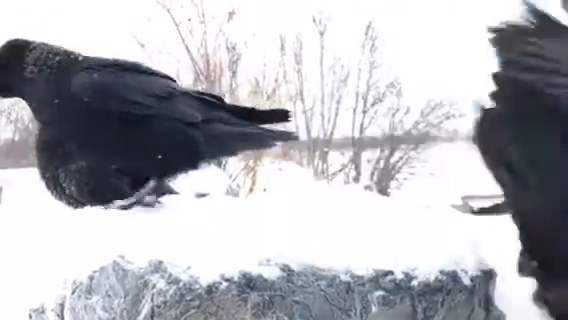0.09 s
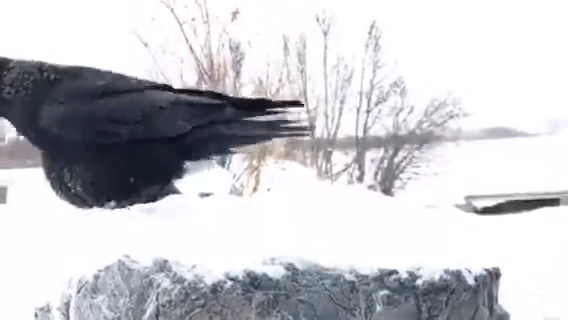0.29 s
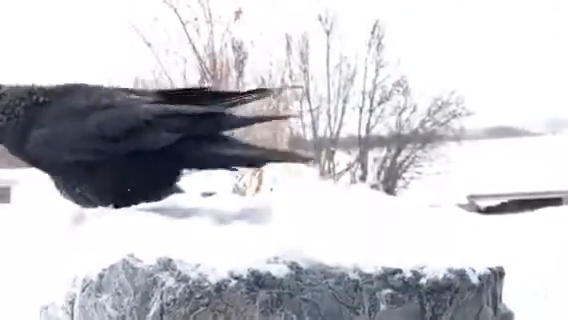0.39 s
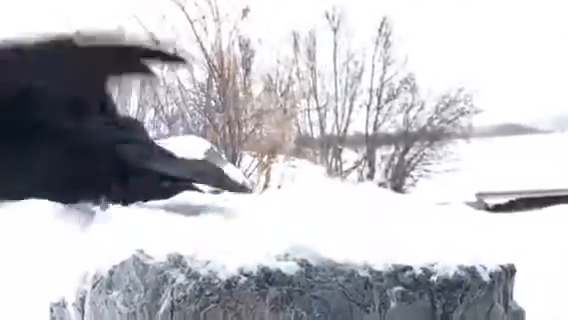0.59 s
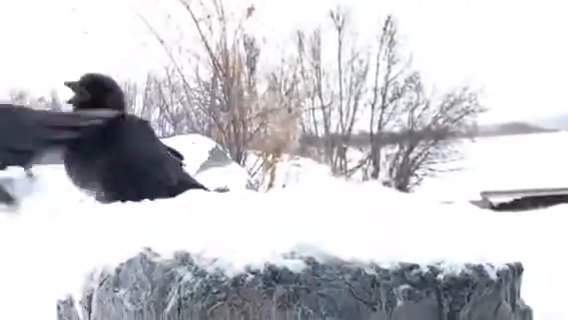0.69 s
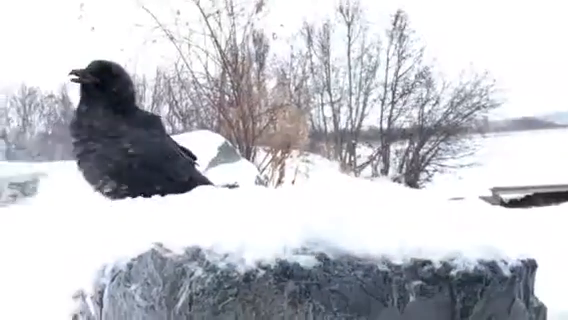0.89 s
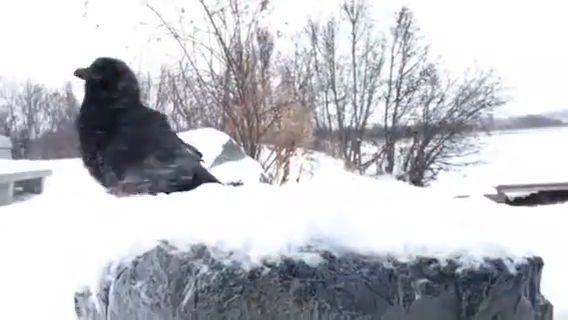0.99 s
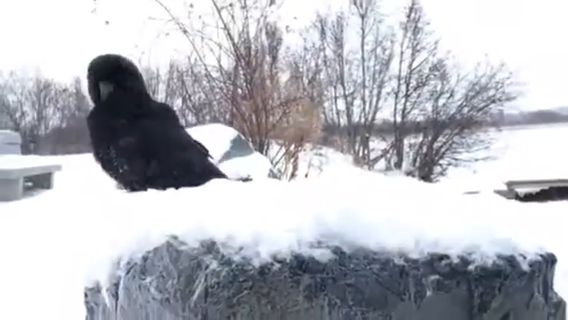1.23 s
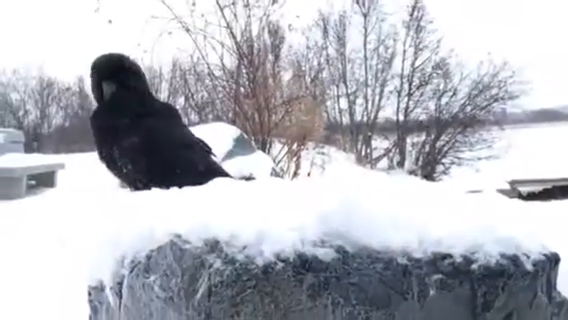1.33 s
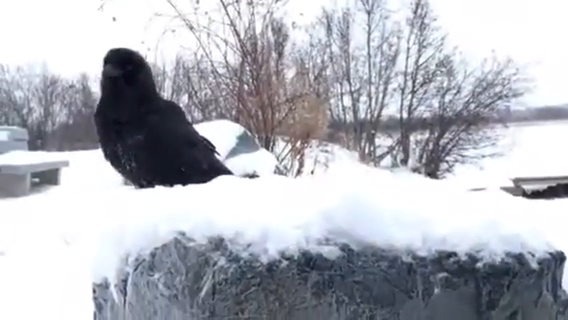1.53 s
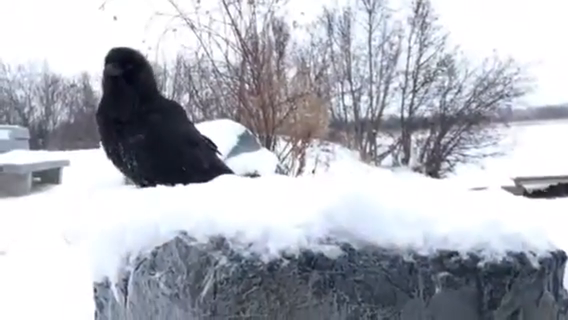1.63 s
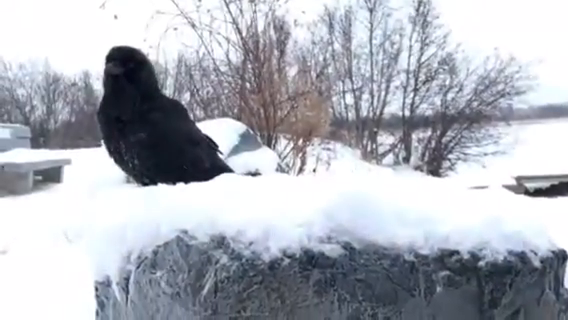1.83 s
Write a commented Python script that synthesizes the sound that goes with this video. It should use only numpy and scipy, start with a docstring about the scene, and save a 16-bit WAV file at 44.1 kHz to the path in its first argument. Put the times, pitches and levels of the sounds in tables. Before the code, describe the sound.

Two short raven calls in a quiet snowy open place, close to the microphone: first a rough caw, then wing strokes and feather ticks, finally a brighter, trembling two-toned cry, with little echo.

```python
"""A snowy stump outdoors with two ravens on it. The near one draws breath (coloured noise) and gives a hoarse
caw: throat-filtered harmonics and air noise, with a voice that keeps catching. Wings and feathers rustle
(patchy noise, swishes, snaps); then comes a clearer, fluttering call, whose second voice joins midway and
makes sum and difference tones. Behind them are a low distant rumble, soft hiss and a faint wavering tone."""
import sys
import numpy as np
from scipy import signal
from scipy.fft import rfft, irfft, next_fast_len
from scipy.io import wavfile
from scipy.ndimage import uniform_filter1d, map_coordinates

SR = 44100
rng = np.random.default_rng(int(sys.argv[2]) if len(sys.argv) > 2 else 0)


def gain_from_decibels(decibels):
    """Convert decibel values to linear amplitude factors."""
    exponent = np.asarray(decibels, float) / 20
    return 10 ** exponent


def unload_wav(signal):
    """Save mono or channel-first audio to the path in sys.argv[1] as 16-bit WAV at rate SR, clipped to [-1, 1]."""
    wavfile.write(
        sys.argv[1],
        SR,
        np.round(np.clip(np.atleast_2d(signal).T, -1, 1) * 32767).astype(np.int16),
    )


N = 83790


def unit(x):
    """Normalisation: scales a signal to rms 1."""
    return x / np.sqrt(np.mean(x ** 2) + 1e-20)


def along(points, hz):
    """Spectral envelope: interpolates (f, value) points on a logarithmic frequency axis."""
    f, v = np.transpose(points)
    return np.interp(np.log(hz + 1), np.log(f + 1), v)


def curves(rows):
    """Piecewise-linear envelopes: each column after the time, then a gate with 2 ms ramps inside the span."""
    s, *columns = np.transpose(rows)
    t = np.arange(N) / SR
    edge = np.clip(np.minimum(t - s[0], s[-1] - t) / .002, 0, 1)
    return [np.interp(t, s, column) for column in columns] + [edge]


def wobble(rate):
    """Slow random modulation: a smooth curve through normal random knots, rate knots a second."""
    knots = rng.standard_normal(int(N * rate / SR) + 4)
    return map_coordinates(knots, [np.arange(N) * rate / SR])


def filtered(x, response):
    """Linear filtering: multiplies the spectrum by a response of frequency, with padding."""
    m = next_fast_len(N + 8192)
    return irfft(rfft(x, m) * response(np.fft.rfftfreq(m, 1 / SR)), m)[..., :N]


def coloured_noise(colour):
    """Spectral shaping: white noise takes the given colour, at rms 1."""
    return unit(filtered(rng.standard_normal(N), lambda hz: gain_from_decibels(along(colour, hz))))


def bell(t, middle, half_length):
    """Gaussian envelope: 1 in the middle, 1/e at one half length away."""
    return np.exp(-((t - middle) / half_length) ** 2)


def patchy(x, db):
    """Time-frequency modulation: smoothed random gains, of rms db, over the short-time spectrum."""
    z = signal.stft(x, nperseg=256)[2]
    field = uniform_filter1d(uniform_filter1d(rng.standard_normal(z.shape), 14, 0), 6, 1)
    return unit(signal.istft(z * gain_from_decibels(db * unit(field)), nperseg=256)[1][:N])


# low rumble with the beat of wings in it: (t/s, level/dB)
RUMBLE_LEVEL = [(0.0, -48.5), (0.38, -59.5), (0.766, -58), (0.904, -40.5), (1.036, -49.5), (1.1, -39.5),
                (1.2, -49), (1.312, -45), (1.348, -55), (1.9, -54.5)]
# spectrum of the rumble: (f/Hz, relative level/dB)
RUMBLE_SPECTRUM = [(8.8, -37.5), (15, -1.5), (43, 2.5), (139, 6.5), (304, -15), (400, -20), (520, -46.5),
                   (880, -120)]
# the hiss sinks by the end of the caw and returns: (t/s, level/dB)
HISS_LEVEL = [(0, -59), (.2, -55.5), (.44, -70), (.75, -61), (1.2, -54.5), (1.5, -59), (1.9, -57)]
# spectrum of the hiss: (f/Hz, relative level/dB)
HISS_SPECTRUM = [(150, -33), (250, -20.5), (445, -13.5), (791, -14), (848, -7), (1340, -8.5), (2460, -10),
                 (2830, -21), (3370, -17), (5890, -17.5), (16200, -28)]
TONE_HZ, TONE_WIDTH_HZ, TONE_DB = 904.5, 70, -11  # centre, half width at 1/e, mid level over the hiss


def background():
    """Band-limited noise: rumble, hiss and a narrow band that is heard as a wavering tone."""
    tone = unit(filtered(rng.standard_normal(N), lambda hz: bell(hz, TONE_HZ, TONE_WIDTH_HZ)))
    far = coloured_noise(HISS_SPECTRUM) + gain_from_decibels(TONE_DB + 4 * wobble(22)) * tone
    rumble = gain_from_decibels(curves(RUMBLE_LEVEL)[0]) * coloured_noise(RUMBLE_SPECTRUM)
    return rumble + gain_from_decibels(curves(HISS_LEVEL)[0]) * far


YARD_DB, YARD_T60_S = -37, .4  # energy of the answer relative to its source, time to decay by 60 dB


def yard(x):
    """Diffuse reverberation: convolution with exponentially decaying noise gives a weak short answer."""
    t = np.arange(SR // 2) / SR
    tail = rng.standard_normal(len(t)) * gain_from_decibels(-60 * t / YARD_T60_S)
    return gain_from_decibels(YARD_DB) * signal.fftconvolve(x, tail / np.linalg.norm(tail))[:N]


# treble level of the rustle, before strokes and crackle: (t/s, level/dB)
RUSTLE_LEVEL = [(0.764, -62), (0.818, -62.5), (0.952, -58.5), (1.168, -59), (1.46, -73)]
# spectrum of rustle and snaps: (f/Hz, relative level/dB)
RUSTLE_SPECTRUM = [(150, -28), (250, -7.5), (819, -9.5), (878, -11.5), (1730, -6.5), (2830, -15.5),
                   (3140, -12.5), (8640, -12.5), (15100, -19), (16200, -18.5)]
# swells of the rustle with each wing stroke: (middle t/s, half length t/s, gain level/dB)
WING_STROKES = [(0.809, 0.032, 7), (.915, .015, 2), (0.948, .015, 6), (1.018, .02, 4), (1.12, 0.009, 5.5)]
# thin swishes and ticks of feathers: (middle t/s, half length t/s, level/dB)
FEATHER_SWISHES = [(.004, 0.005, -52.5), (0.081, 0.0011, -51), (0.464, 0.028, -50.5),
                   (0.549, 0.00185, -52.5), (0.622, 0.14, -60.5), (1.271, 0.0021, -39), (1.8, 0.017, -56.5)]
# spectrum of the swishes: (f/Hz, relative level/dB)
SWISH_SPECTRUM = [(1470, -39), (2500, -10.5), (3390, -6), (5910, -7), (16200, -10.5)]
# feather snaps: (one length before the peak t/s, relative peak level/dB, rise and decay length t/s)
FEATHER_SNAPS = [(0.767, -28, 0.0012), (0.7825, -26, 0.0016), (0.8055, -28, 0.0014), (0.939, -26, 0.002),
                 (0.989, -23, 0.0012), (1.0125, -30, 0.0015), (1.095, -19, 0.002), (1.156, -29, 0.002)]
RUSTLE_DB = 7.5  # the whole band over its treble
CRACKLE_DB, PATCHY_DB = 1.7, 2.5  # unevenness in time; over time and frequency


def wings():
    """Friction noise: uneven rustle swelling with the strokes, thin swishes and single snaps of feathers."""
    level_db, edge = curves(RUSTLE_LEVEL)
    t = np.arange(N) / SR
    stroke_db = sum(db * bell(t, s, half) for s, half, db in WING_STROKES)
    crackle_db = CRACKLE_DB * (wobble(69) + wobble(500))
    grain = edge * gain_from_decibels(level_db + RUSTLE_DB + stroke_db + crackle_db)
    swish = sum(gain_from_decibels(db) * bell(t, s, half) for s, half, db in FEATHER_SWISHES)
    snaps = 0.2 * sum(gain_from_decibels(db) * np.exp(-np.abs(t - s - length) / length) for s, db, length in FEATHER_SNAPS)
    rustle = grain * patchy(coloured_noise(RUSTLE_SPECTRUM), PATCHY_DB)
    return rustle + swish * coloured_noise(SWISH_SPECTRUM) + snaps * coloured_noise(RUSTLE_SPECTRUM)


# the indrawn breath before the caw: (t/s, level/dB around which it wavers)
INHALE_LEVEL = [(0.085, -67.5), (0.127, -48), (0.203, -45.5), (0.207, -31.5)]
# spectrum of the breath: (f/Hz, relative level/dB)
INHALE_SPECTRUM = [(410, -59), (700, -56), (977, -17), (1350, 1.5), (2400, -23.5), (2760, -12), (3480, -9),
                   (4980, -17.5), (6600, -15.5), (7700, -20), (15000, -24.5)]


def inhale():
    """Turbulent flow: air drawn through the open throat makes wavering coloured noise."""
    level_db, edge = curves(INHALE_LEVEL)
    return edge * gain_from_decibels(level_db + wobble(110)) * coloured_noise(INHALE_SPECTRUM)


# clear call: (t/s, pitch f/Hz, 1st to 4th partial level/dB in four columns, base level/dB of the
# higher partials, base flutter depth 0-1)
CALL_TRACK = [(1.205, 754, -49, -46, -49, -75, -73, 0.3), (1.219, 798, -25, -27.5, -29.5, -36, -45, 0.22),
              (1.247, 891.3, -18, -27, -33, -54, -38.5, 0.1),
              (1.277, 913, -19.5, -29.5, -30.5, -41.5, -40, 0.07),
              (1.341, 949.4, -19, -37.5, -53, -55, -45, 0.16),
              (1.375, 936.3, -20, -32, -44.5, -41.5, -41, 0),
              (1.475, 920.8, -23, -27, -36, -38.5, -42, 0.11),
              (1.495, 905, -25.5, -26.5, -38, -53, -42.5, 0.07),
              (1.511, 829, -32.5, -30, -38, -53, -47, 0.1), (1.538, 567, -56.5, -39.5, -57, -73, -68, 0)]
# throat resonances that the 5th to 14th partials pass through: (f/Hz, gain level/dB)
HIGHER_RESONANCES = [(3800, -3.5), (4350, -3.5), (4950, -12.5), (5450, -5), (6000, -10.5), (6500, -12.5),
                     (7400, -20), (8300, -25), (10500, -38), (13000, -30.5)]
# second voice: (t/s, pitch f/Hz, reference level/dB)
SECOND_VOICE = [(1.285, 1198, -50), (1.305, 1161, -24.5), (1.322, 1194, -25), (1.362, 1185, -25),
                (1.414, 1156, -29), (1.428, 1164, -64)]
# mixed tones: (multiple of first pitch, multiple of second pitch, level/dB over the second voice)
MIXED_TONES = [(0, 1, -1), (0, 2, -5.5), (1, 1, -12.5), (-1, 2, -14), (2, -1, -32), (1, 2, -16),
               (2, 2, -21.5), (1, 3, -29), (3, 1, -25.5), (3, 2, -28.5), (4, 2, -31)]
# air noise in the call: (f/Hz, relative level/dB)
CALL_AIR_SPECTRUM = [(350, -99), (600, -81), (933, -38), (1050, -33), (1170, -18), (1540, -28), (2360, -24),
                     (9000, -45), (11700, -83), (19800, -120)]
FLUTTER_HZ, FLUTTER_DIP_S = 83.2, 1.229  # rate at the time of this dip
FLUTTER_SLOWS = 50  # Hz per s
FLUTTER_GROWS, FLUTTER_SWING = .66, .13  # deeper per multiple; cycles of pitch swing per unit of depth
HIGHER_WAVER_DB, HIGHER_WAVER_RATE = 4, 70  # each higher partial swells and fades on its own; knots/s
CALL_JITTER = .016  # cycles of phase wander
CALL_NOISE_DB, ROUGH_NOISE_DB = -28, -16  # air relative to the first fundamental and to the second voice


def call():
    """Intermodulation: a fluttering harmonic voice mixes with a second into sum and difference tones."""
    pitch, *low_db, high_db, depth, edge = curves(CALL_TRACK)
    pitch2, second_db, edge2 = curves(SECOND_VOICE)
    since_dip = np.arange(N) / SR - FLUTTER_DIP_S
    turns2 = np.cumsum(pitch2) / SR + CALL_JITTER * wobble(190)
    flutter = (FLUTTER_HZ - FLUTTER_SLOWS * since_dip / 2) * since_dip + 0.042 * wobble(30)
    swing = FLUTTER_SWING * depth * np.sin(2 * np.pi * flutter)
    turns = np.cumsum(pitch) / SR + CALL_JITTER * wobble(210) - swing

    def tone(m, n, db, lag=0):
        """Amplitude modulation: the tone at m times the first pitch plus n times the second, fluttering."""
        dip = np.clip(depth * (1 + FLUTTER_GROWS * (abs(m) + n - 1)), 0, .8)
        envelope = 1 - dip * np.cos(2 * np.pi * (flutter + 0.25 * lag))
        return gain_from_decibels(db) * np.sqrt(2) * np.cos(2 * np.pi * (m * turns + n * turns2 + lag)) * envelope

    def waver():
        """Random modulation: a level curve in dB for one partial."""
        return HIGHER_WAVER_DB * wobble(HIGHER_WAVER_RATE)

    first = sum(tone(k + 1, 0, db) for k, db in enumerate(low_db))
    for m in range(5, 15):
        first = first + tone(m, 0, high_db + along(HIGHER_RESONANCES, m * pitch) + waver(), rng.random())
    mixed = 0
    for m, n, db in MIXED_TONES:
        m, n = round(m), round(n)
        level_db = second_db + db + (db < -21) * waver()  # only the weak ones waver
        mixed = mixed + tone(m, n, level_db, (m + 1) % 2 / 2)  # even m: half a cycle against the first voice
    air = coloured_noise(CALL_AIR_SPECTRUM)
    clear = first + gain_from_decibels(low_db[0] + CALL_NOISE_DB) * air
    rough = mixed + gain_from_decibels(second_db + ROUGH_NOISE_DB) * air
    return edge * clear + edge2 * rough


# hoarse caw: (t/s, pitch f/Hz before catches, then level/dB of the low, middle and high band)
CAW_TRACK = [(0.208, 624.3, -14.5, -51, -61.5), (0.22, 739, -13.5, -16.5, -41.5),
             (0.228, 683.4, -11.5, -22, -36.5), (0.242, 777.7, -12, -16.5, -37),
             (0.282, 809, -13.5, -19, -37), (0.336, 816.7, -11, -25.5, -53.5), (0.344, 813, -13, -24, -50),
             (0.362, 779, -9, -38.5, -60), (0.372, 788.4, -10.5, -36, -54.5),
             (0.378, 762.7, -12, -40.5, -61), (0.4, 689, -17, -35.5, -64.5), (0.418, 511, -27, -34.5, -51),
             (0.43, 360.5, -33, -46, -70)]
# throat resonances: (f/Hz, relative level/dB within a band)
THROAT = [(180, -83.5), (300, -48), (412, -9.5), (787, -10), (1430, 7), (1580, 8.5), (1690, 0.5),
          (2360, -20.5), (3030, -7.5), (4160, -6.5), (4830, -16), (6620, -16.5), (7820, -43.5),
          (9880, -38.5), (16000, -59.5)]
# the two edges between the three bands: f/Hz
BAND_EDGES = (2250, 7200)
# the voice catches: (t/s, depth 0-1, half width t/s, cycles slipped)
VOICE_CATCHES = [(.2145, .85, .002, .25), (.228, .6, .0015, .15), (.253, .15, .002, 0),
                 (.281, .45, .0013, .5), (.306, .6, .0016, .5), (.3305, .7, .0016, .3),
                 (.341, .65, .0014, .5), (.356, .92, .002, .25), (.3645, .8, .0025, .25),
                 (.384, .9, .0018, .25), (.396, .9, .002, .25)]
# base ratio of air noise to tone, one per band
AIR_SHARE = (.1, .45, 2)
# more air noise while caught, one factor per band
CATCH_AIR = (.25, 1.3, 0)
SAG_CYCLES, SAG_S, SAG_LEAD_S = .3, .005, .002  # the pitch sags into each catch
PULSE_SCATTER = .17  # cycles; small, so the partials lock into one sharp pull per cycle
CAW_JITTER, CAW_JITTER_RATE = .036, 180  # cycles of phase wander, knots/s
# each partial swells and fades on its own: above the 2nd, up to the 2nd, knots/s
PARTIAL_WAVER_DB, LOW_WAVER_DB, WAVER_RATE = 3.5, 1.3, 120
AIR_LOW_HZ = 620  # the air noise falls away below this
RASP_FROM_S, RASP_GROWS = .27, 10  # later the upper bands get more air, growth per s


def caw():
    """Source and filter: harmonics and pulsed air pass the throat; catches dip the level and slip the cycle."""
    pitch, *levels_db, edge = curves(CAW_TRACK)
    t = np.arange(N) / SR
    openness, slip = np.ones(N), np.zeros(N)
    for s, depth, width, cycles in VOICE_CATCHES:
        openness = openness * (1 - depth * bell(t, s, width))
        sag = SAG_CYCLES * np.tanh((t - s + SAG_LEAD_S) / SAG_S)
        slip = slip + (cycles * np.tanh((t - s) / width) + sag) / 2
    on = edge > 0
    turns = (np.cumsum(pitch) / SR - slip + CAW_JITTER * wobble(CAW_JITTER_RATE))[on]
    openness = openness[on]

    k = np.arange(1, 31)[:, None]  # partial numbers
    hz = k * pitch[on]
    band = np.digitize(hz, BAND_EDGES)
    size = gain_from_decibels(along(THROAT, hz))
    waver_db = np.where(k > 2, PARTIAL_WAVER_DB, LOW_WAVER_DB)
    waver = gain_from_decibels(waver_db * np.array([wobble(WAVER_RATE)[on] for _ in k]))
    phase = k * turns + PULSE_SCATTER * rng.standard_normal(k.shape)
    partials = -waver * size * np.cos(2 * np.pi * phase)

    air = rng.standard_normal(N)
    out = np.zeros(N)
    for b, (level_db, noise) in enumerate(zip(levels_db, AIR_SHARE)):
        def air_response(f):
            """High-pass and band filtering: the throat's response to air in this band."""
            in_band = np.digitize(f, BAND_EDGES) == b
            return gain_from_decibels(along(THROAT, f)) * in_band / (1 + (AIR_LOW_HZ / (f + 1)) ** 10)

        tone = (partials * (band == b)).sum(0) / np.sqrt((size ** 2 * (band == b)).sum(0) / 2)
        puff = unit(filtered(air, air_response))[on]
        share, power = noise, 1
        if b > 0:  # in the upper bands the air pulses with the voice
            puff = puff * (1 + np.cos(2 * np.pi * turns)) / np.sqrt(1.5) * gain_from_decibels(2.9 * wobble(150)[on])
            share = noise * (1 + RASP_GROWS * np.clip(t[on] - RASP_FROM_S, 0, 1))
            power = 1 + share ** 2 / 2
        voiced = (openness * tone + share * puff) / np.sqrt(power)
        caught = CATCH_AIR[b] * (1 - openness) * puff
        out[on] += gain_from_decibels(level_db[on]) * edge[on] * (voiced + caught)
    return out


def scene():
    """Superposition: all sources add in one channel, and the voices also reach the yard."""
    voices = caw() + call()
    return (voices + yard(voices) + inhale() + wings() + background())[None]


def roll_off(x):
    """The treble ends steeply here."""
    return signal.sosfilt(signal.butter(12, 17030, fs=SR, output="sos"), x)


def record(dry):
    """Signal chain: the finished mix goes to the output stage."""
    return roll_off(dry)


dry = scene()
out = record(dry)
unload_wav(out)
```